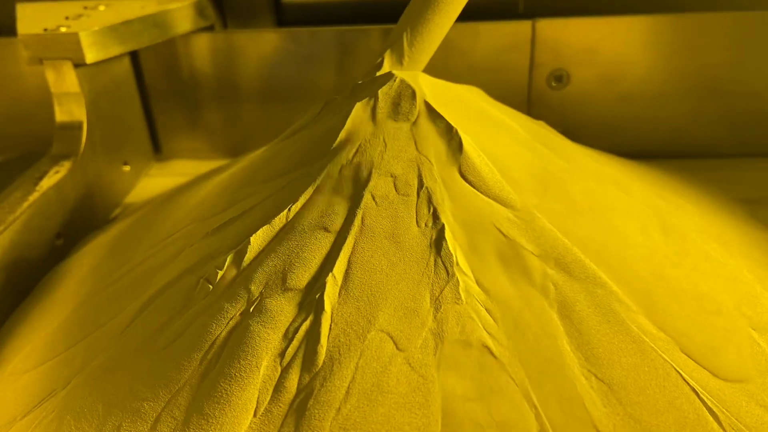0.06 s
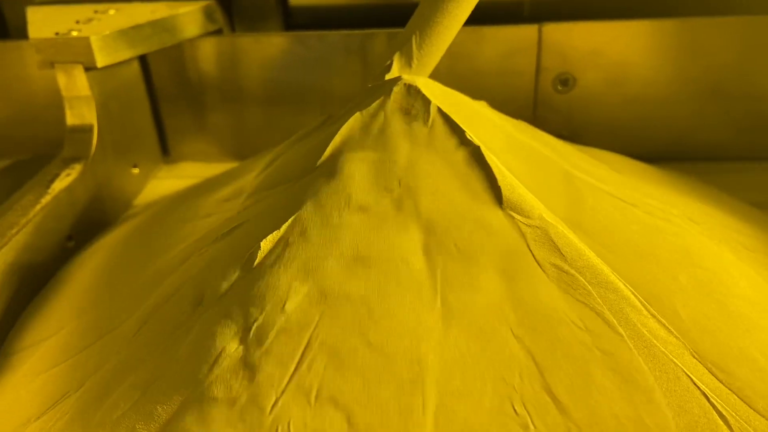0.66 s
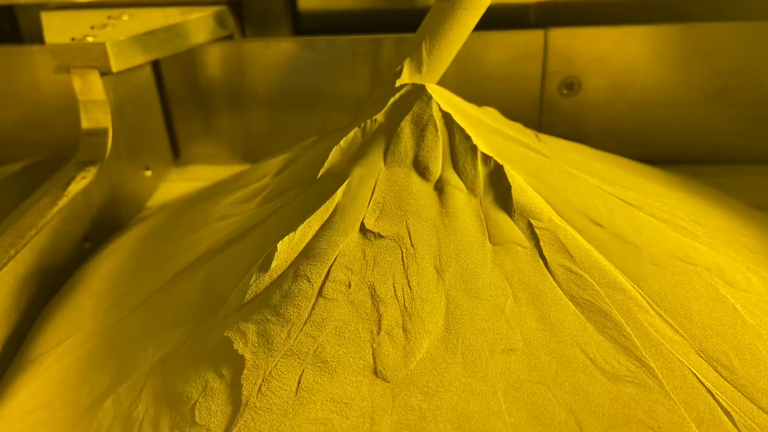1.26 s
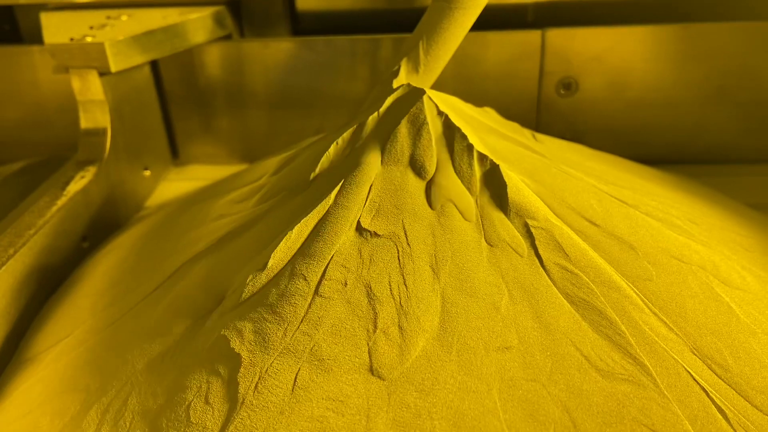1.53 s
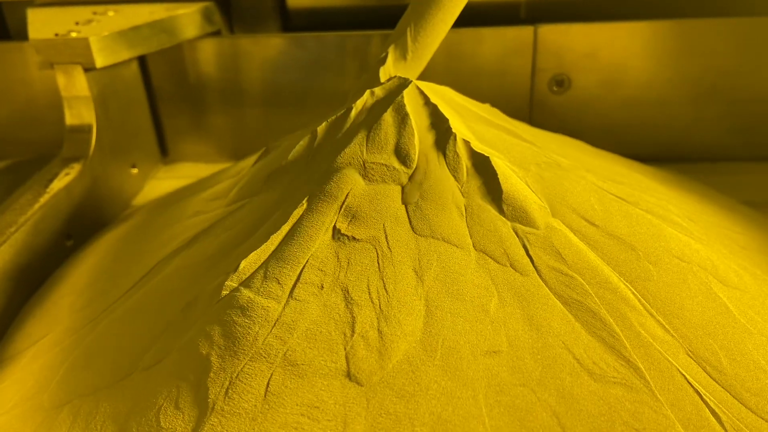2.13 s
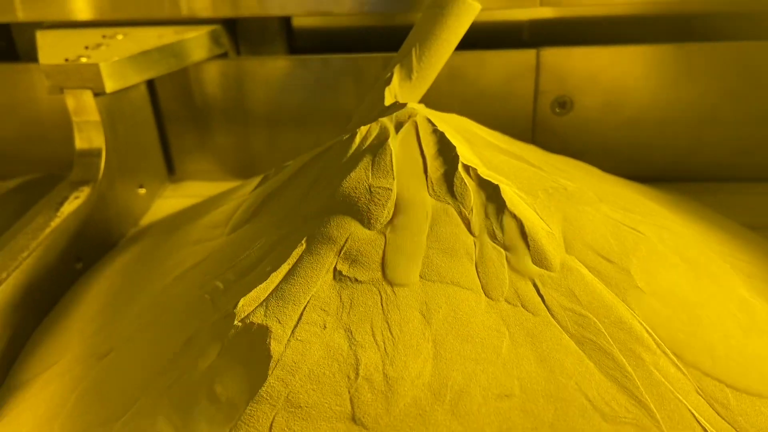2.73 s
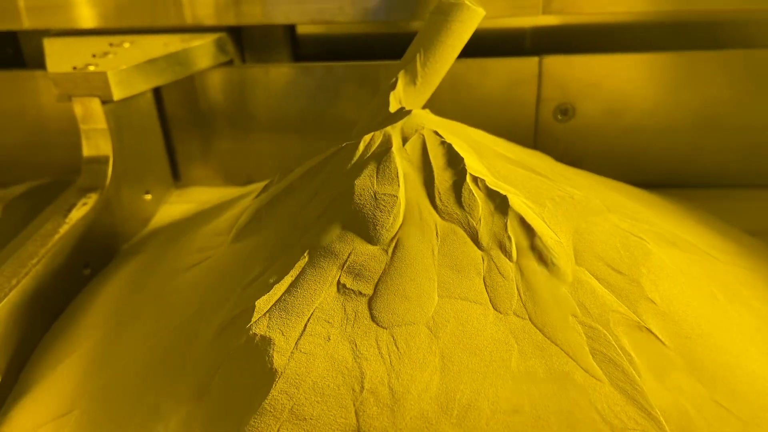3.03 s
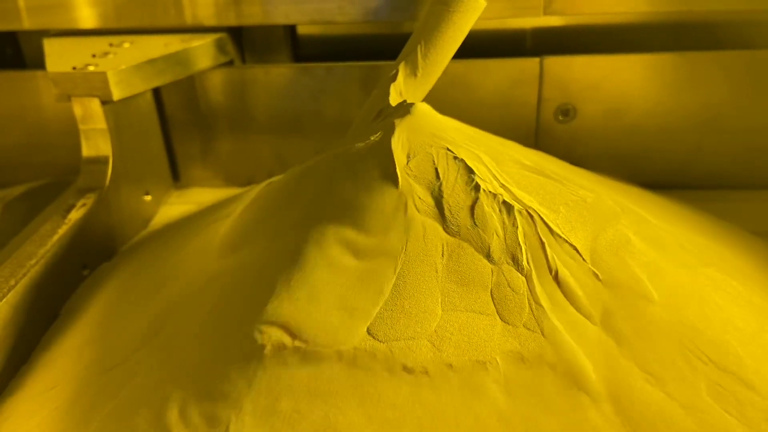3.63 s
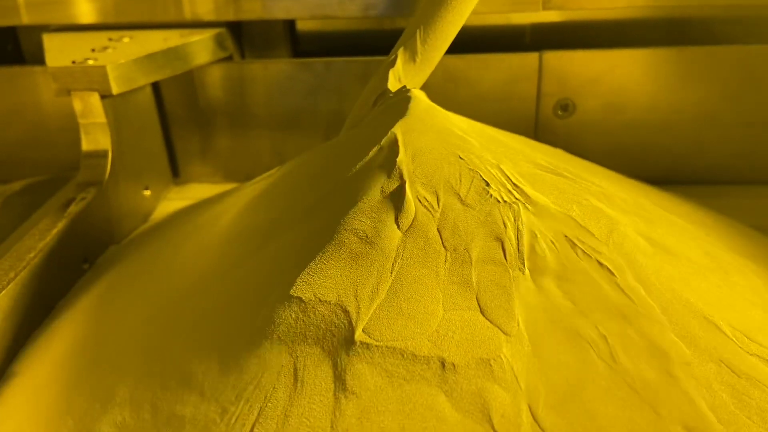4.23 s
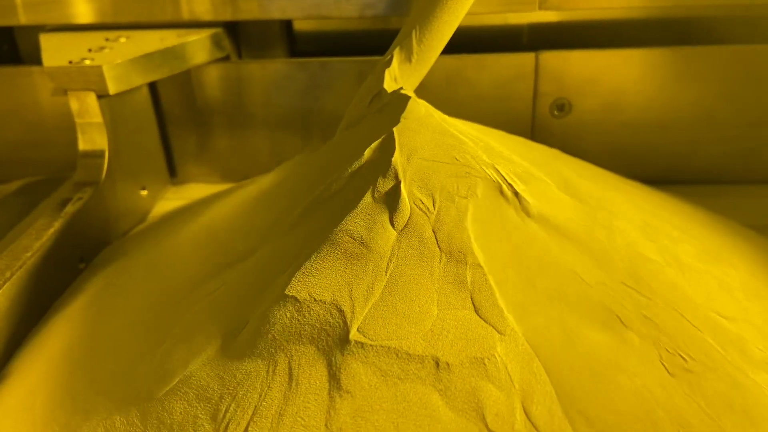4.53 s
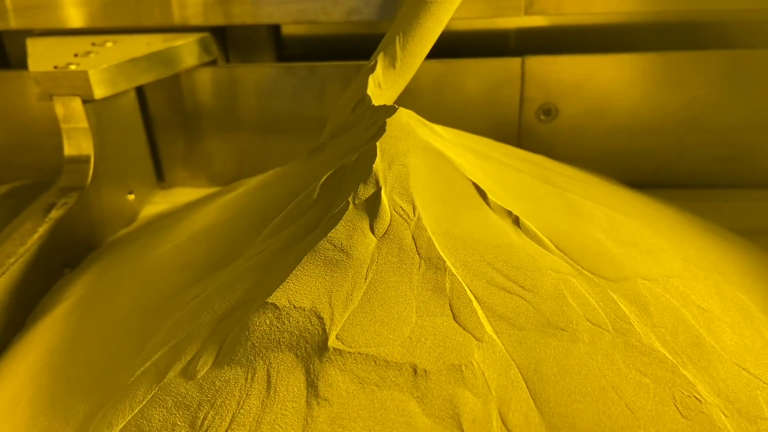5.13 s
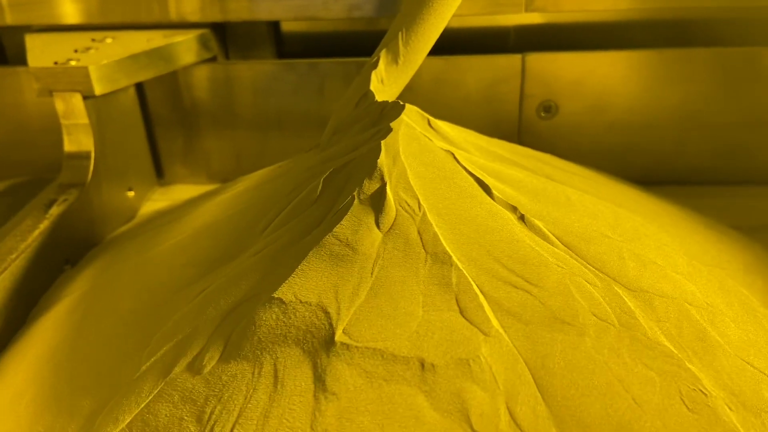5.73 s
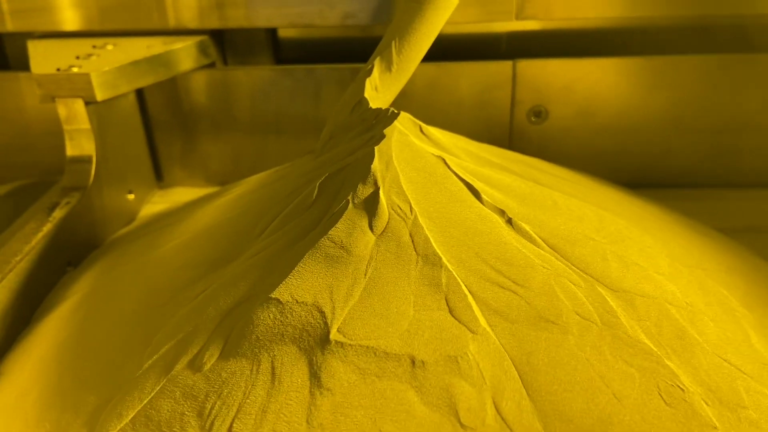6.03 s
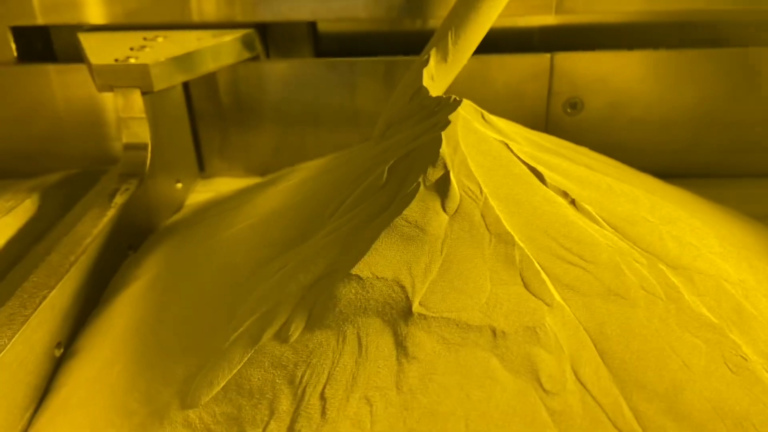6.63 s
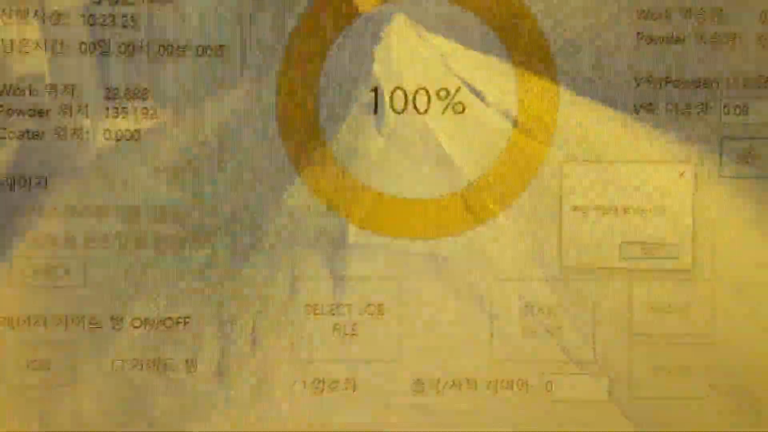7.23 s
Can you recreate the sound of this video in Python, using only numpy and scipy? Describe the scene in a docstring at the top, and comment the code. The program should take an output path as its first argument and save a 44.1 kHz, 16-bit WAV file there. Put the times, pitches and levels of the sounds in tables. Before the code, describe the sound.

A machine's low throbbing hum swells twice and dies away over a steady rush of air, with a few light knocks near the end.

```python
"""A vibrator shakes powder out of a chute in two bursts, inside a metal powder-bed printer: its
unbalanced rotor makes a loud, almost pure low hum that throbs as it settles. A weaker second rotor
runs up with it and coasts down; the feeder bumps as it starts and stops. Under them circulating gas
rumbles and hisses, blower, fans and electronics add thin tones, and powder slides faintly.
Near the end come a few light, dull knocks with scuffs and soft thumps."""
import sys
import numpy as np
from scipy import signal
from scipy.fft import rfft, irfft, next_fast_len
from scipy.io import wavfile
from scipy.ndimage import map_coordinates

SR = 44100
rng = np.random.default_rng(int(sys.argv[2]) if len(sys.argv) > 2 else 0)


def store_pcm(level_fs):
    """Save levels as 16-bit WAV."""
    pcm = np.round(np.clip(level_fs, -1, 1) * 32767).astype(np.int16)
    wavfile.write(sys.argv[1], SR, np.atleast_2d(pcm).T)


N = 321048
TIME_S = np.arange(N) / SR


def amp(db):
    """Decibels to gain."""
    return 10 ** (np.asarray(db) / 20)


def along(points, hz):
    """Interpolate (freq_hz, value) points on a log frequency axis."""
    freqs, values = np.transpose(points)
    return np.interp(np.log(hz + 1), np.log(freqs + 1), values)


def curves(rows):
    """One per-sample curve for each column after the time."""
    times, *columns = np.transpose(rows)
    return [np.interp(TIME_S, times, column) for column in columns]


def ramp(start_s, length_s):
    """Linear rise from 0 to 1."""
    return np.clip((TIME_S - start_s) / length_s, 0, 1)


def swell(peak_s, half_width_s):
    """Bell-shaped rise and fall."""
    return np.exp(-((TIME_S - peak_s) / half_width_s) ** 2)


def wobble(rate_hz):
    """Smooth random curve, rate_hz knots a second."""
    knots = rng.standard_normal(int(N * rate_hz / SR) + 4)
    return map_coordinates(knots, [TIME_S * rate_hz])


def filtered(x, response):
    """Apply a frequency response."""
    size = next_fast_len(N + SR // 2)
    return irfft(rfft(x, size) * response(np.fft.rfftfreq(size, 1 / SR)), size)[..., :N]


def turning(hz):
    """Angle at a changing rate, from a random start."""
    return 2 * np.pi * (np.cumsum(hz) / SR + rng.random())


def sine(angle):
    """Sine of rms 1."""
    return np.sqrt(2) * np.sin(angle)


def stereo_sine(angle, phase_rad):
    """Tone with a left-right phase difference."""
    return sine(angle + np.array([[phase_rad], [-phase_rad]]) / 2)


# Stereo balance: freq_hz, left_minus_right_db
BALANCE = [(140, -0.65), (330, 1), (550, 0), (1150, -3.5), (1800, -0.5), (3000, 3.5), (6000, 1.7),
           (9000, -0.5)]

def panned(x):
    """Each band leans left or right."""
    return filtered(x, lambda hz: amp(along(BALANCE, hz) * np.array([[.5], [-.5]])))


# Standing waves: centre_hz, width_hz, gain_db
CHAMBER_MODES = [(420, 10, -4), (468, 14, -3), (740, 24, 3.5), (835, 20, -1.5), (968, 14, -3),
                 (1096, 24, -4.5), (1575, 15, -3), (1805, 42, -6.5), (1910, 30, 4), (2020, 42, 4),
                 (2155, 32, 4), (2320, 25, -2.5), (2725, 35, -3), (2900, 35, -3), (3100, 45, 2.5),
                 (3230, 45, 3), (3440, 45, 3), (3560, 40, -3), (3790, 50, 4.5), (5270, 55, 3),
                 (5405, 32, 5), (5750, 220, -3), (6250, 60, 3)]
# Stereo width: freq_hz, side_minus_mid_db
WIDTH = [(60, -25.5), (140, -18.5), (210, -6), (330, -3.5), (500, -7), (770, 2.5), (1100, -1), (1700, 1.5),
         (2700, -5.5), (4200, -3.5), (6400, -7), (15000, -1)]

def chamber_noise(spectrum, direct_share):
    """Stereo noise coloured by standing waves, which crowd into a random ripple higher up."""
    def colour(hz):
        modes_db = sum(db * np.exp(-((hz - centre) / width) ** 2) for centre, width, db in CHAMBER_MODES)
        knots_hz = np.arange(3800, SR / 2, 55)
        ripple_db = 1.4 * np.interp(hz, knots_hz, rng.standard_normal(len(knots_hz)), left=0)
        return amp(along(spectrum, hz) + modes_db + ripple_db)

    mid, diffuse = filtered(rng.standard_normal((2, N)), colour)
    quadrature = filtered(mid, lambda hz: 1j)
    side = np.sqrt(direct_share) * quadrature + np.sqrt(1 - direct_share) * diffuse
    side = filtered(side, lambda hz: amp(along(WIDTH, hz)))
    return panned(np.array([mid + side, mid - side]) / np.std(mid))


def late_fade(start_s=6.86, db_per_s=12.5):
    """Gain of duct noise, hiss, blower and fans: steady, then sinking toward the end."""
    return amp(-db_per_s * np.maximum(TIME_S - start_s, 0))


# Gas flow spectra: freq_hz, density_db
RUMBLE_SPECTRUM = [(15, -68.5), (25, -46.5), (36, -26), (49, -24), (65, -14.5), (86, -14.5), (105, -6.5),
                   (123, 1), (171, -6), (220, -24), (260, -31.5), (340, -55), (570, -120)]
DUCT_SPECTRUM = [(170, -29), (240, -3.5), (290, -3.5), (375, 1.5), (460, -6), (565, -1.5), (680, -8),
                 (810, -14.5), (1000, -10.5), (1150, -15.5), (1450, -17.5), (1800, -19.5), (2200, -55)]
HISS_SPECTRUM = [(1100, -30), (1800, -6), (2050, 1), (2800, -4), (3600, -8.2), (5400, -10.3), (7000, -12),
                 (11000, -20), (15500, -22.5)]
# Rumble envelope: time_s, level_db
RUMBLE_ENVELOPE = [(0, -33), (4.6, -33.5), (6.4, -36.5), (7.28, -38)]

def gas():
    """Circulating gas: rumble in the chamber's lowest resonance, duct noise and hiss."""
    rumble_db = curves(RUMBLE_ENVELOPE)[0] + 1.4 * wobble(3.9)
    rumble = amp(rumble_db) * chamber_noise(RUMBLE_SPECTRUM, direct_share=0)
    duct = amp(-46 + .98 * wobble(6.3)) * chamber_noise(DUCT_SPECTRUM, direct_share=.05)
    hiss = amp(-58.5 + .26 * wobble(4.2)) * chamber_noise(HISS_SPECTRUM, direct_share=.1)
    return rumble + late_fade() * (duct + hiss)


# Blower shaft harmonics: order, level_db, stereo_phase_rad
BLOWER_ORDERS = [(1, -54, 0.96), (2, -61.5, 0.7), (3, -48, -1.38), (6, -51, 2.5), (8, -69, 1),
                 (10, -73, 0.5), (13, -78, -0.8), (14, -75, 1), (15, -74.5, 0.7), (19, -87.5, -1.5)]

def blower(shaft_hz=199.97):
    """The gas blower sounds wavering multiples of its shaft rate."""
    shaft = turning(shaft_hz + .035 * wobble(3))
    tones = sum(amp(db + .42 * wobble(5)) * stereo_sine(order * shaft + .17 * wobble(13), phase)
                for order, db, phase in BLOWER_ORDERS)
    return late_fade() * panned(tones)


# Fan tones: pitch_hz, level_db, stereo_phase_rad
FAN_TONES = [(311.5, -59, .1), (320.5, -56.5, .1), (937, -68, 1.5), (1248, -68, 2), (2375, -80, .3),
             (5417, -83, .2)]

def fans():
    """Fan tones, each wavering on its own."""
    tones = sum(amp(db + .61 * wobble(13)) * stereo_sine(turning(hz + .6 * wobble(4)), phase)
                for hz, db, phase in FAN_TONES)
    return late_fade() * panned(tones)


# Electronics whine: pitch_hz, level_db
WHINE_TONES = [(8188, -84.5), (9994, -70)]

def electronics(creep_db_per_s=.2, drop_db=20):
    """A thin whine creeps up in level, then all but stops."""
    whine = sum(amp(db + .8 * wobble(30)) * stereo_sine(turning(hz + 6 * wobble(50)), phase_rad=2)
                for hz, db in WHINE_TONES)
    gain_db = -.5 + creep_db_per_s * TIME_S - drop_db * ramp(start_s=6.2, length_s=.28)
    return amp(gain_db) * whine


def feed_drive(pitch_hz=1750, level_db=-66):
    """A drive's whine swells and fades while powder is fed."""
    return amp(level_db) * swell(peak_s=3.05, half_width_s=1) * sine(turning(pitch_hz + .5 * wobble(3.6)))


# Grain hiss: freq_hz, density_db
POWDER_SPECTRUM = [(2500, -8), (4500, -1), (7000, -1.5), (9000, -3), (11300, 1), (13000, -3), (15500, -4.5)]
# Powder slides: start_s, rise_s, hold_s, level_db, decay_db_per_s
POWDER_SLIDES = [(-.2, .17, .2, -65, 22), (.635, .01, .01, -65.5, 250), (1.45, .36, .2, -64.5, 6),
                 (5.8, .15, .3, -65, 15), (6.62, .15, .03, -62.5, 40)]

def powder(trickle_db=-80):
    """Fine grains slide down the heap as a high, uneven hiss; a trickle goes on between slides."""
    slides = [ramp(start, rise) * amp(db - decay * np.maximum(TIME_S - start - rise - hold, 0))
              for start, rise, hold, db, decay in POWDER_SLIDES]
    envelope = np.sqrt(amp(trickle_db) ** 2 + np.sum(np.square(slides), axis=0))
    uneven_db = .8 * wobble(22) + 1.8 * wobble(400)
    return envelope * amp(uneven_db) * chamber_noise(POWDER_SPECTRUM, direct_share=.1)


# Scuffs around the knocks: peak_s, rub_db, scrape_db, half_width_s
SCUFF_EVENTS = [(6.1, -63.5, -61, .24), (6.434, -58.5, -61, .03), (6.502, -57.5, -62.5, .02),
                (6.593, -51.5, -58.5, 0.014), (6.745, -53.5, -56.5, 0.019), (6.801, -51, -65, 0.035),
                (6.952, -43.5, -58, 0.011)]
# Friction spectra: freq_hz, density_db
RUB_SPECTRUM = [(200, -5), (600, 4), (1400, -5.5), (2800, -21), (6500, -26), (15000, -40.5)]
SCRAPE_SPECTRUM = [(900, -17), (1900, 0.5), (2500, -4), (4000, -9.5), (7000, -22.5), (12000, -35)]

def scuffs():
    """Surfaces meet with a brief dull rub and a bright scrape."""
    roughness = amp(3 * wobble(300))
    rub = sum(amp(db) * swell(peak, width) for peak, db, _, width in SCUFF_EVENTS)
    scrape = sum(amp(db) * swell(peak, width) for peak, _, db, width in SCUFF_EVENTS)
    return roughness * (rub * chamber_noise(RUB_SPECTRUM, direct_share=0)
                        + scrape * chamber_noise(SCRAPE_SPECTRUM, direct_share=0))


# Pushes on the housing: peak_s, level_db, half_width_s
PUSHES = [(6.608, -32, 0.0087), (6.73, -26.5, 0.026), (6.797, -34, 0.018)]

def thumps(pitch_hz=122):
    """Soft pushes sound the chamber's lowest resonance for a few cycles."""
    return sum(amp(db) * swell(peak, width) * sine(turning(np.full(N, pitch_hz)))
               for peak, db, width in PUSHES)


# Contacts: start_s, level_db, ring_hz, ring_t60_s, tick_relative_db, thud_relative_db
LIGHT_KNOCKS = [(6.435, -25, 554, 0.0093, -21, -2), (6.497, -31.5, 623, 0.017, -20, 2),
                (6.5975, -19.5, 620, 0.013, -17.5, -2.5), (6.748, -20, 415, 0.0049, -4, -8),
                (6.788, -25.5, 710, 0.012, -27, -2), (6.939, -29, 630, 0.011, -19, -10),
                (6.9475, -20, 513, 0.016, -15, -7)]
FEEDER_BUMPS = [(.262, -34.5, 250, .05, -39, -10), (1.505, -25, 189.5, .035, -42.5, -12),
                (4.26, -30, 237, .02, -45, -6)]
# Contact tick: freq_hz, gain_db
TICK_SPECTRUM = [(700, -21.5), (1300, -5), (1850, 8), (2400, 3), (3300, -8), (5800, -15.5), (8000, -26),
                 (15000, -32)]

def knocks(contacts, tick_t60_s=.0061, wall_t60_s=.31, wall_db=-6):
    """Each contact is a tick, a damped panel ring and a thud, answered by the chamber walls."""
    t = np.arange(SR // 4) / SR
    flex_s = np.maximum(t - .0012, 0)  # the panel gives just after the touch

    def mode(hz, t60_s):
        wave = np.sin(2 * np.pi * hz * flex_s) * amp(-60 * flex_s / t60_s)
        wave *= 1 - np.exp(-flex_s / .0022)
        return wave / np.abs(wave).max()

    rings, ticks = np.zeros((2, N + SR))
    thud = mode(hz=187, t60_s=.011)
    for start_s, db, hz, t60_s, tick_db, thud_db in contacts:
        start = round(start_s * SR)
        span = slice(start, start + len(t))
        rings[span] += amp(db) * (mode(hz, t60_s) + amp(thud_db) * thud)
        ticks[span] += amp(db + tick_db - 60 * t / tick_t60_s) * rng.standard_normal(len(t))
    direct = filtered(rings[:N], lambda hz: 1 / (1 + (hz / 1150) ** 6))
    direct += filtered(ticks[:N], lambda hz: amp(along(TICK_SPECTRUM, hz)))
    walls = rng.standard_normal((2, len(t))) * amp(-60 * t / wall_t60_s)
    walls /= np.linalg.norm(walls[0])
    return direct + amp(wall_db) * signal.fftconvolve(direct[None], walls, axes=1)[:, :N]


# Second rotor under drive: on_s, off_s
DRIVE_SPANS = [(-.6, -0.13), (1.5, 4)]
# Housing response: rotor_hz, level_db
HOUSING_RESPONSE = [(114, -68), (122, -53), (130, -34), (139, -29), (154, -35.5), (168, -27), (180, -29.5),
                    (199, -39)]

def second_rotor(idle_hz=113.95, full_hz=199.3, spin_up_s=.31, coast_s=.33):
    """A rotor runs up and coasts down through the housing's resonances, beating with the hum."""
    speed = sum(ramp(on, spin_up_s) * np.exp(-np.maximum(TIME_S - off, 0) / coast_s)
                for on, off in DRIVE_SPANS)
    hz = idle_hz + (full_hz - idle_hz) * speed
    angle = turning(hz)
    tone = stereo_sine(angle, phase_rad=-.18) + amp(-31.5) * sine(2 * angle)
    return amp(along(HOUSING_RESPONSE, hz)) * tone


# Troughs of the vibrator's swing: time_s, depth_db
THROB_TROUGHS = [(1.7, 0.6), (1.87, 1.2), (1.99, 2.5), (2.15, 2.5), (2.295, 4), (2.485, 5), (2.69, 8.6),
                 (2.895, 3), (3.105, 6), (3.32, 5), (3.49, -3.2), (3.67, 2.8), (3.95, 2.5), (4.12, 2),
                 (4.32, 3)]

def throb():
    """The swing beats, in dB: round crests between narrow troughs."""
    rows = [(time_s, cycle, db) for cycle, (time_s, db) in enumerate(THROB_TROUGHS)]
    cycles, depth_db = curves(rows)
    share = (amp(depth_db) - 1) / (amp(depth_db) + 1)
    return 20 * np.log10(np.abs(1 - share * np.exp(2j * np.pi * cycles)))


def panel(drive_hz, angle, resonance_hz=395, width_hz=9, level_db=-44.5):
    """A panel sings as the tone driving it passes through its resonance."""
    return amp(level_db) / (1 + ((drive_hz - resonance_hz) / width_hz) ** 2) * sine(angle)


# Chute buzz: time_s, harmonic_2_db, harmonic_3_db
CHUTE_BUZZ = [(.3, -58, -64), (1.55, -55, -67.5), (1.83, -46, -58), (2.3, -54.5, -64.5), (2.68, -46.5, -53),
              (2.8, -45.5, -63), (2.88, -40.5, -61.5), (3.1, -47, -57), (3.3, -41.5, -49),
              (3.5, -37.5, -51), (3.65, -36, -44), (3.79, -39.5, -58), (3.93, -36, -47.5), (4.04, -35, -56),
              (4.14, -36, -51), (4.23, -51, -53)]
# Vibrator bursts: on_s, off_s, swing_db, settle_loss_db, wind_down_s, wind_down_gain_db, release_s
VIBRATOR_BURSTS = [(-.4, 0.273, -9, -1.5, 0.055, -.5, .052), (1.521, 4.263, -7.5, 6.5, .2, 2, .022)]
HUM_HZ, REFERENCE_SWING_DB, SAG_HZ_PER_DB = 143.15, -10.5, .84
ATTACK_S, SETTLE_S, BUZZ_DUCK_DB_PER_DB = .032, .65, 1.4
RUN_UP_S, RUN_UP_HZ, RUN_UP_DB, WIND_DOWN_HZ = .24, 12, 6.5, 7
TAIL_DB, TAIL_S, TAIL_SAG_HZ_PER_S = -16, .18, 30

def vibrator():
    """An unbalanced rotor shakes the chute, slower as it swings wider; loose contact buzzes in troughs."""
    out = np.zeros((2, N))
    throb_db = throb()
    second_db, third_db = curves(CHUTE_BUZZ)
    harmonics = [(2, second_db), (3, third_db), (5, third_db - 5.5)]
    for on_s, off_s, first_db, loss_db, wind_down_s, gain_db, release_s in VIBRATOR_BURSTS:
        starting = 1 - ramp(on_s, RUN_UP_S)
        settled = 1 - np.exp(-np.maximum(TIME_S - on_s, 0) / SETTLE_S)
        stopping = ramp(off_s - wind_down_s, wind_down_s)
        since_off_s = np.maximum(TIME_S - off_s, 0)
        swing_db = first_db - loss_db * settled + gain_db * stopping + throb_db
        hz = HUM_HZ - SAG_HZ_PER_DB * (swing_db - REFERENCE_SWING_DB)
        hz -= RUN_UP_HZ * starting + WIND_DOWN_HZ * stopping
        hz -= TAIL_SAG_HZ_PER_S * np.minimum(since_off_s, 1)
        angle = turning(hz + .2 * wobble(13))
        hum = amp(swing_db - RUN_UP_DB * starting) * stereo_sine(angle, phase_rad=-.21)
        buzz = sum(amp(db - BUZZ_DUCK_DB_PER_DB * throb_db + 1.2 * wobble(10)) * sine(order * angle)
                   for order, db in harmonics)
        spinning = ramp(on_s - ATTACK_S / 2, ATTACK_S) * np.exp(-since_off_s / TAIL_S)
        grip = 1 - (1 - amp(TAIL_DB)) * ramp(off_s - release_s / 2, release_s)  # let go, it spins faintly
        out += spinning / np.sqrt(2) * (grip * (hum + buzz) + panel(3 * hz, 3 * angle))
    return out * amp([[-.1], [.1]])


def scene():
    """Everything heard at the powder heap."""
    rotors = vibrator() + second_rotor()
    background = gas() + blower() + fans() + feed_drive() + electronics() + powder()
    contacts = knocks(LIGHT_KNOCKS) + knocks(FEEDER_BUMPS) + scuffs() + thumps()
    return rotors + background + contacts


def record(dry):
    """Brick-wall low-pass."""
    return filtered(dry, lambda hz: hz < 15750)


dry = scene()
out = record(dry)
store_pcm(out)
```